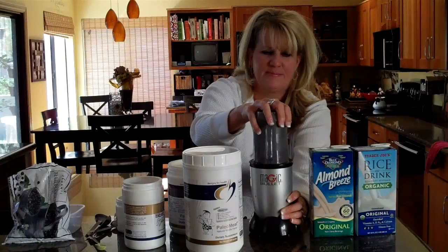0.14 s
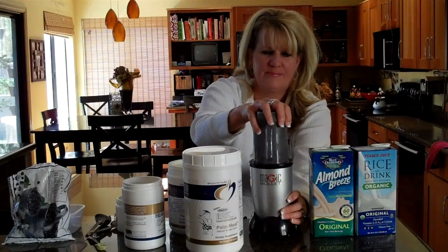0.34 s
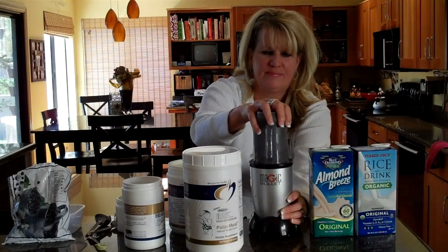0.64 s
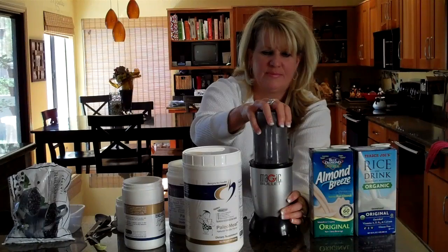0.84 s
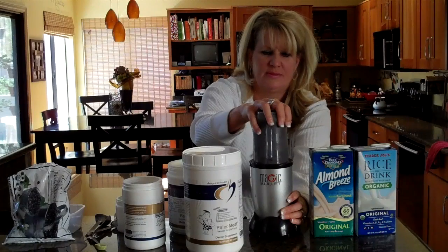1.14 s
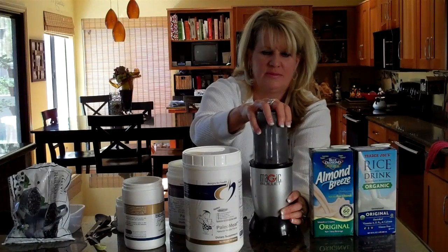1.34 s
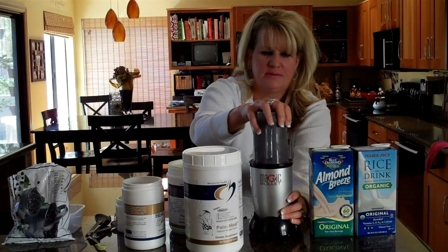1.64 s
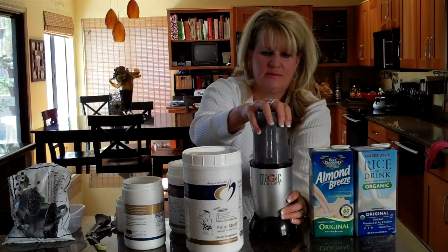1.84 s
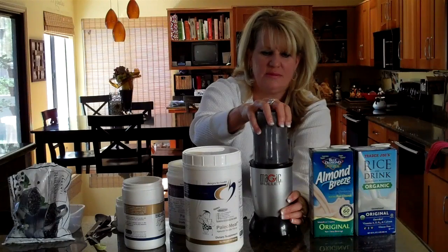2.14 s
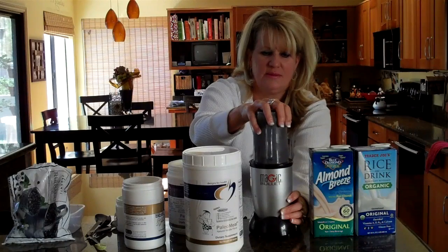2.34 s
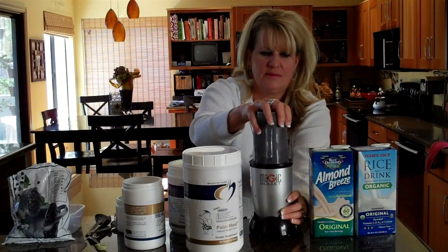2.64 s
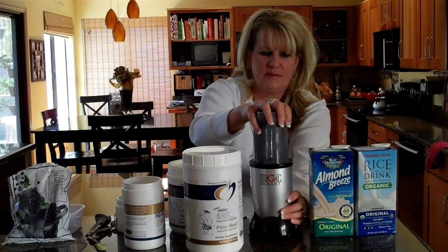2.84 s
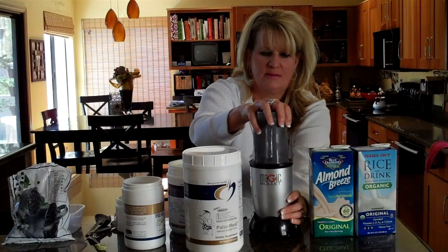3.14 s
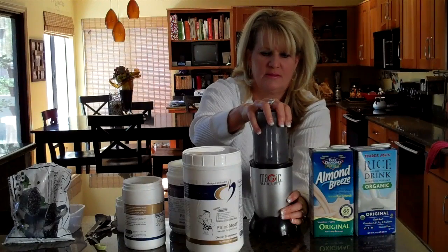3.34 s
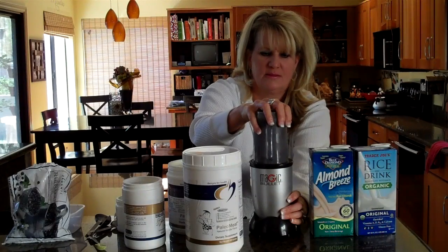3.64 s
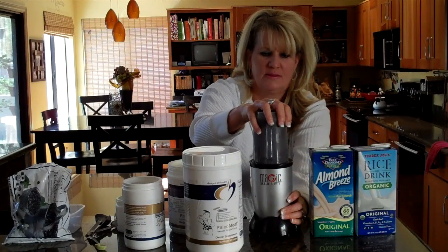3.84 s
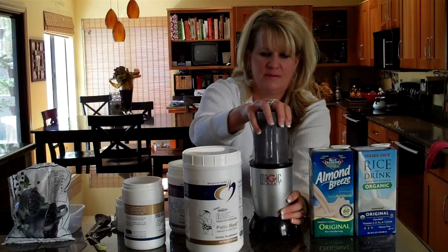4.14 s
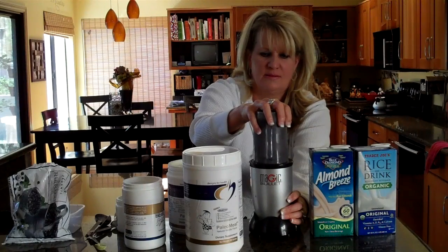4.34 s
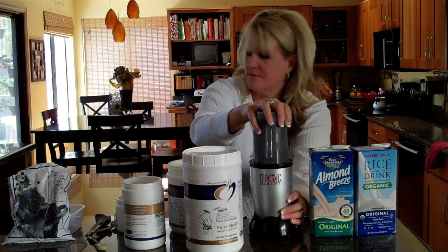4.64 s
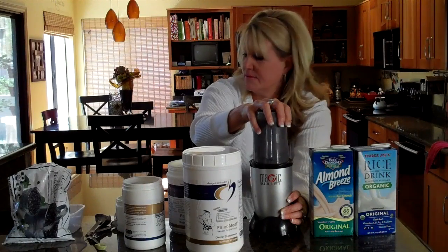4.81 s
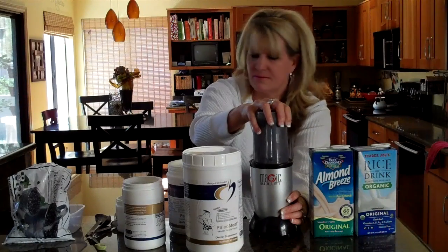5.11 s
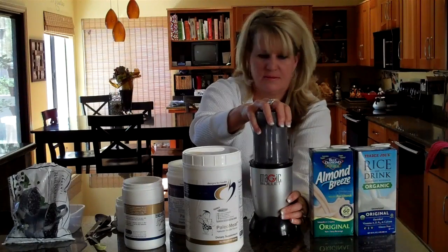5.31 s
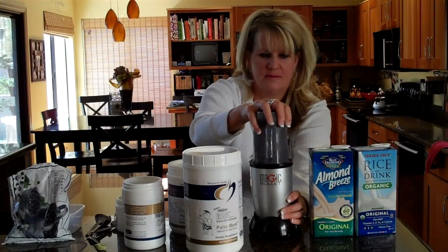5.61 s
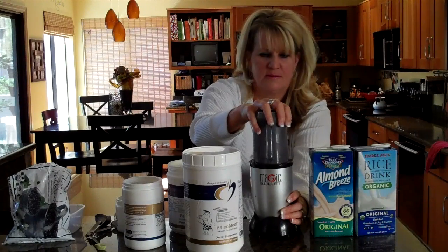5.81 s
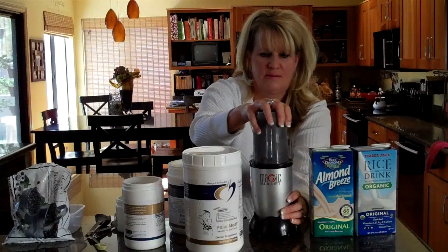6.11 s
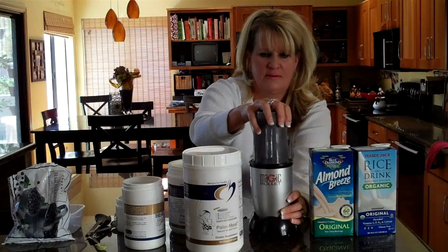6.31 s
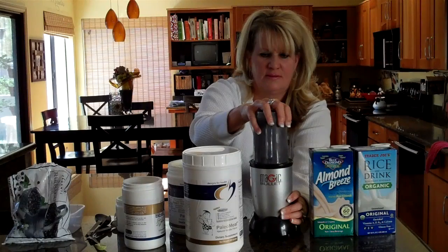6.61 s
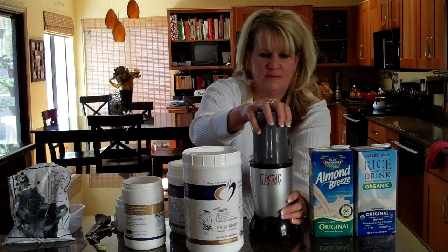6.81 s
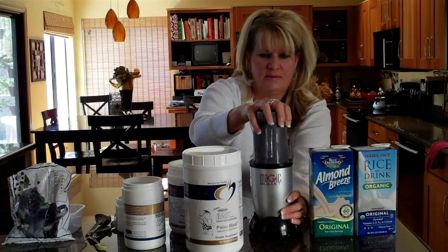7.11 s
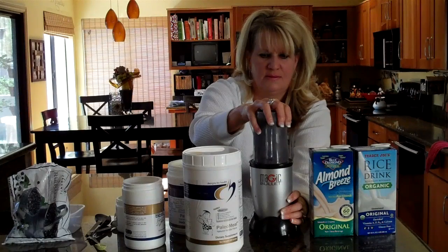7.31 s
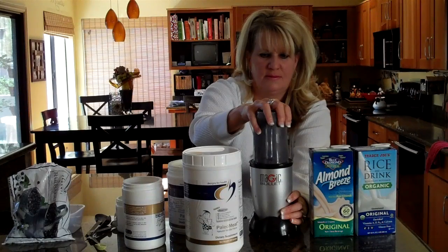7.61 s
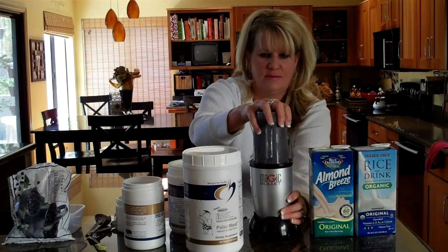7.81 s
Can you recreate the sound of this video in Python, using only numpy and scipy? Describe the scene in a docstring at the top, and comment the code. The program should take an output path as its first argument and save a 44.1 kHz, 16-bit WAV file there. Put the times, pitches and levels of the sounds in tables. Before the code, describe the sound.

A small blender runs continuously on a kitchen counter, its motor whining and wavering while ice cracks, rattles and churns inside a plastic cup.

```python
"""A small blender crushes ice on a kitchen counter, a short way from a close pair of microphones.
From the first moment the motor whines, its pitch surging and sagging along a set course, over a faint rumble.
The blade churns slush, filtered noise, and flings chips, random clicks, against the plastic cup.
Large lumps knock at set times and small ones at random: each cracks, rings the cup, thumps the base, sheds chips.
Early on there is little boom from the base; it grows as the ice breaks down. The kitchen rings a little."""
import sys
import numpy as np
from scipy import signal
from scipy.fft import rfft, irfft
from scipy.io import wavfile
from scipy.ndimage import uniform_filter1d, minimum_filter1d

SR = 44100
rng = np.random.default_rng(int(sys.argv[2]) if len(sys.argv) > 2 else 0)


def put_to_file(sound):
    """Save the sound as 16-bit audio at rate SR, in the file named by the first command-line argument."""
    columns = np.atleast_2d(sound).T  # one column per channel
    safe = np.clip(columns, -1, 1)
    whole_steps = np.round(safe * 32767)
    wavfile.write(sys.argv[1], SR, whole_steps.astype(np.int16))


N = 350991
TIME = np.arange(N) / SR  # seconds

# Resonances of the cup, raised above the colour of what strikes it.
# Each row: frequency in Hz, width in Hz, lift in dB.
CUP_RESONANCES = [(410, 55, 0.5), (903, 77, 6.5), (1069, 29, 2.5), (1826, 130, 4), (2120, 162, 10),
                  (3250, 700, 7.5), (3770, 130, 3), (6140, 820, 5.5), (7010, 260, 7.5), (9700, 570, 2.5)]


def gain_of(db):
    """Turns decibels into amplitude."""
    return 10 ** (np.asarray(db) / 20)


def evened(x):
    """Scales a sound to an rms of one."""
    return x / np.sqrt(np.mean(x ** 2) + 1e-20)


def read(points, hz):
    """Reads a table of frequency and value, interpolating over log frequency."""
    f, value = np.transpose(points)
    return np.interp(np.log(hz + 1), np.log(f + 1), value)


def curves(rows):
    """Draws each column of a time table as a curve with a value at every sample."""
    seconds, *columns = np.transpose(rows)
    return [np.interp(TIME, seconds, column) for column in columns]


def add(mix, start_s, sound):
    """Mixes a sound in from its start time, cut off at the end of the mix."""
    part = mix[max(round(start_s * SR), 0):][:len(sound)]
    part += sound[:len(part)]


def drift(rate_hz):
    """Makes a slow random wander of unit rms by low-passing noise near rate_hz."""
    hz = np.fft.rfftfreq(N, 1 / SR)
    low_pass = 1 / (1 + (hz / rate_hz) ** 4)
    return evened(irfft(rfft(rng.standard_normal(N)) * low_pass, N))


def colour(x, points, peaks=(), size=4096):
    """Applies a causal filter of unit energy: a broad colour with resonances on top."""
    hz = abs(np.fft.fftfreq(size, 1 / SR))
    resonances = sum(lift / (1 + (2 * (hz - f) / width) ** 2) for f, width, lift in peaks)
    log_gain = np.log(gain_of(read(points, hz) + resonances))
    # the Hilbert transform supplies the minimum phase
    response = np.exp(np.conj(signal.hilbert(log_gain)))
    taps = np.fft.ifft(response).real[:size // 2]
    return signal.oaconvolve(x, taps / np.linalg.norm(taps))[:N]


def equalise(x, points, share=1):
    """Applies a share of a table of dB gains without delay."""
    gain_db = share * read(points, np.fft.rfftfreq(N, 1 / SR))
    return irfft(rfft(x) * gain_of(gain_db), N)


def clicks(per_s, spread_db, cap):
    """Scatters random impacts of either sign: many small, a few large."""
    size = gain_of(spread_db * np.minimum(rng.exponential(1, N), cap))
    sign = rng.choice([-1, 1], N)
    return size * sign * (rng.random(N) < per_s / SR)


def rumble():
    """A faint steady rumble of motor and house: coloured noise."""
    # Each row: frequency in Hz, relative level in dB.
    rumble_colour = [(20, -7), (60, -4.5), (90, -14), (120, -5.5), (160, -16), (300, -24), (1000, -51)]
    return gain_of(-72) * evened(colour(rng.standard_normal(N), rumble_colour))


def motor(turns):
    """The shaft hums; armature slots and blade whine at its multiples, wavering as the load flutters."""
    # Loudness of the motor. Each row: time in seconds, whine in dB added to the order levels, shaft hum in dB.
    loudness = [(0, -17, -63), (1, -12, -69), (1.2, -13, -61), (1.95, -11, -59), (2.2, -15, -73),
                (2.65, -5, -64), (4.15, 0, -63), (4.45, -11, -75), (5.1, -11, -81), (5.75, -3, -74),
                (7.96, 0, -71)]
    # Whine of slots and blade. Each row: multiple of the shaft speed, level in dB before the whine's loudness.
    orders = [(3, -53), (6, -41), (10, -53), (12, -51), (20, -44), (40, -39), (50, -49), (60, -56),
              (70, -56)]
    whine_db, hum_db = curves(loudness)
    whine = np.zeros(N)
    for multiple, db in orders:
        waver = 1 + 0.19 * drift(22)
        phase = 2 * np.pi * multiple * turns + 0.5 * drift(24)
        whine += gain_of(db) * waver * np.sin(phase)
    # the highest line is blurred
    top = orders[-1][0]
    sizzle = gain_of(-63) * drift(92) * np.sin(2 * np.pi * top * turns)
    hum = gain_of(hum_db) * np.sin(2 * np.pi * turns)
    mains_hum = gain_of(-75) * np.sin(2 * np.pi * 120 * TIME)
    return gain_of(whine_db) * (whine + sizzle) + hum + mains_hum


def base(push):
    """The motor base booms on the counter after each push: decaying modes that take a moment to build."""
    # Modes of the base on the counter. Each row: frequency in Hz, relative level in dB, t60 in seconds.
    modes = [(357.8, -9.5, 0.28), (405.6, 4.5, 0.17), (417, -3, 0.028), (482.3, -2.5, 0.14)]
    t = np.arange(SR // 4) / SR
    ring = sum(gain_of(db - 60 * t / t60) * np.cos(2 * np.pi * hz * t) for hz, db, t60 in modes)
    build_up = 1 - np.exp(-t / .004)
    return signal.oaconvolve(push, ring * build_up)[:N]


def lumps(grind_db):
    """Lists all lumps that hit the cup: large ones as set, small at random, harder when the blade works harder."""
    # Each row: time in seconds, ring of the cup in dB, crack in dB, thump of the base in dB.
    large = [(0.0117, -9, -30, -37), (0.022, -17, -24, -36), (0.164, -11, -26.5, -46),
             (0.2677, -11.5, -30, -50), (0.3, -3, -27, -31), (0.446, -12.5, -35, -50),
             (0.4847, -22, -24.5, -36), (0.625, -10.5, -30, -34.5), (0.6635, -9, -34, -41),
             (0.7016, -13, -30.5, -42), (0.7727, -29, -28, -46), (0.7928, -25, -29, -34.5),
             (0.9233, -12, -31.5, -50), (1.0111, -10.5, -27.5, -43), (1.0355, -11, -26, -38),
             (1.0805, -18, -25, -45), (1.0976, -19, -24, -37), (1.1175, -5, -21.5, -37),
             (1.2075, -19, -28, -45), (1.2336, -12, -24.5, -41), (1.411, -12, -27.5, -55),
             (1.495, -18, -29, -38), (1.736, -5.5, -24, -47), (1.7749, -3, -18, -53),
             (1.8696, -2, -19.5, -27.5), (1.8782, -1, -18, -38), (2.0416, -8, -25.5, -26.5),
             (2.0527, -9, -33, -31.5), (2.2295, -15, -31, -52), (2.37, -14, -30, -56),
             (2.575, -11, -26, -33.5), (2.599, -8, -28, -43), (2.707, -4, -25, -53), (2.7125, -5, -24, -41),
             (2.7374, -18, -17.5, -30), (2.8567, -19, -26, -40), (2.9988, -15, -24.5, -52),
             (3.0722, -9.5, -26, -53), (3.1004, -12, -25.5, -41), (3.1872, -4, -24, -33.5),
             (3.2256, -13.5, -23.5, -47), (3.3513, -12, -24, -36.5), (3.4946, -4, -25, -35),
             (3.6356, -13, -24, -43), (3.6725, -9, -34, -36), (3.7875, -9.5, -34, -43),
             (3.8619, -22, -18.5, -34), (4.1689, -7, -21.5, -35), (4.1841, -23, -22, -34),
             (4.3203, 0, -16, -43), (4.5828, -7.5, -24.5, -41), (4.6294, -6.5, -21, -34),
             (4.6736, -6.5, -27.5, -40), (4.7619, -7, -26, -38.5), (4.8314, -27, -29.5, -38),
             (4.9343, -18, -29, -42), (5.0175, -19, -28, -46), (5.0604, -19, -29.5, -50),
             (5.2231, -17, -32, -39), (5.248, -27, -23, -40), (5.2789, -11, -28, -52),
             (5.3483, -13, -24, -44), (5.4248, -12, -23.5, -58), (5.5527, -14, -25, -33),
             (5.6361, -20, -23, -39), (5.8306, -2.5, -19, -43), (5.9928, -18, -25, -45),
             (6.2921, -20, -29, -43), (6.3159, -10, -29.5, -47), (6.3777, -10, -26.5, -38),
             (6.4255, -21, -24, -37), (6.5224, -13, -27, -33.5), (6.6773, -26, -24.5, -32.5),
             (6.7989, -13, -23, -43), (6.9476, -16, -26.5, -34), (7.0658, -13, -32, -35),
             (7.127, -13, -24, -42), (7.2472, -17, -22.5, -34), (7.2664, -9, -30, -35),
             (7.3995, -13, -25.5, -42), (7.728, -9, -31, -46)]
    per_s, spread_db = 11, 2.5  # how often small lumps strike, how unevenly (either way)
    small_db = np.array([10, -3.5, -18.5])  # their ring, crack and thump against the grinding level
    chance = rng.random((140, 4))
    times = np.cumsum(-np.log(1 - chance[:, 0])) / per_s
    levels = small_db + spread_db * (2 * chance[:, 1:] - 1)
    levels = levels + np.interp(times, TIME, grind_db)[:, None]
    small = np.column_stack([times, levels])
    return np.vstack([large, small])


def showers(hits):
    """Each lump that breaks throws a brief shower of chips, which sets their level here."""
    shower_db, settle_s = -8, 0.036  # level against the lump's crack, time constant
    t = np.arange(SR // 4) / SR
    level = np.zeros(N)
    for start_s, _, crack_db, _ in hits:
        add(level, start_s, gain_of(crack_db + shower_db) * np.exp(-t / settle_s))
    return level


def churn(turns, grind_db, lumpy, hits):
    """Slush rushes round the cup; chips strike its wall in time with the blade and boom the base."""
    # Colours of slush and of chips. Each row: frequency in Hz, relative level in dB per Hz.
    slush_colour = [(30, -29), (100, -26.5), (150, -23), (220, -9.5), (300, -8.5), (380, 4), (520, -1),
                    (680, 0), (900, 0.5), (1300, 1.5), (2000, -1), (3500, -18.5), (8000, -12.5),
                    (12500, -32.5)]
    chip_colour = [(300, -54.5), (1000, -23.5), (1400, -12.5), (1750, -7), (2650, -10), (3250, -4.5),
                   (4100, -4), (4800, -11), (5500, -11), (6100, -12.5), (6650, -15), (7100, -13),
                   (7900, -20), (9700, -22.5), (12000, -45)]
    # levels in dB against the grinding; slush and boom shift with the share of ice still in lumps
    fine_db, coarse_db = -2, -9
    slush_db = -9.5 + 0.5 * lumpy
    boom_db = -13.5 - 20 * lumpy
    blade = 1 + 0.16 * np.cos(2 * np.pi * turns) + 0.16 * np.cos(4 * np.pi * turns)

    rush = evened(colour(rng.standard_normal(N), slush_colour, CUP_RESONANCES))
    slush = rush * gain_of(grind_db + slush_db + 0.14 * drift(41))

    patter = evened(colour(clicks(7000, 1.74, 1.63) * blade, chip_colour, CUP_RESONANCES))
    steady_level = gain_of(grind_db + fine_db + 1.93 * drift(30))
    fine = patter * np.hypot(steady_level, showers(hits))

    strikes = clicks(330, 8.2, 2.6) * blade
    coarse = evened(colour(strikes, chip_colour, CUP_RESONANCES)) * gain_of(grind_db + coarse_db)
    boom = evened(base(strikes)) * gain_of(grind_db + boom_db)
    return slush + fine + coarse + boom


def knocks(hits):
    """A lump shatters for a few ms, rings the stiff cup wall and pushes the base."""
    # Colour of the crack. Each row: frequency in Hz, relative level in dB per Hz.
    crack_colour = [(80, -37), (250, -16), (800, -10.5), (1800, -1), (3000, 1), (4000, 8), (5000, 0),
                    (6100, 5), (6650, -2.5), (7200, -2), (8000, -7.5), (9700, -14), (13000, -41.5)]
    ring_hz, ring_spread_hz = 3313, 126  # the wall rings a little differently wherever it is struck
    t = np.arange(SR // 40) / SR
    rings, cracks, pushes = np.zeros((3, N))
    swell = (1 - np.exp(-t / .0006)) * np.exp(-t / .0012)
    swell = swell / swell.max()
    shatter = (1 - np.exp(-t / .0005)) * (np.exp(-t / .0014) + .04 * np.exp(-t / .008))
    for start_s, ring_db, crack_db, thump_db in hits:
        splinters, rattle = rng.standard_normal((2, len(t)))
        hz = ring_hz + ring_spread_hz * rng.standard_normal()
        # the lump still presses on the wall and unsettles its ring
        wobble = 0.031 * np.cumsum(uniform_filter1d(rattle, size=30))
        add(rings, start_s, gain_of(ring_db) * swell * np.sin(2 * np.pi * hz * t + wobble))
        add(cracks, start_s, gain_of(crack_db) * evened(splinters * shatter))
        add(pushes, start_s, gain_of([thump_db]))
    # the cup's rings and cracks carry little below about 300 Hz
    low_cut = signal.butter(2, 300, "high", fs=SR, output="sos")
    cup = signal.sosfilt(low_cut, rings + colour(cracks, crack_colour, CUP_RESONANCES))
    return cup + base(pushes)


def kitchen(x, wet_db):
    """The room adds a few early echoes and a short diffuse tail, different at each microphone."""
    # Decay of the room. Each row: frequency in Hz, t60 in seconds.
    decay = [(150, 1), (1000, 0.28), (4000, 0.42), (12000, 0.31)]
    # Echoes off nearby tubs, cartons and the counter, against the direct sound before the stereo is widened.
    # Each row: delay in seconds, left level in dB, right level in dB.
    echoes = [(.0012, -12.5, -26), (.0029, -37, -49), (.0113, -18.5, -13), (0.0164, -28, -15),
              (.0212, -52, -29)]
    noise = rng.standard_normal((2, SR // 2))
    hz, t, spectrum = signal.stft(noise, SR, nperseg=256)
    # so close to the blender, the bass below about 700 Hz arrives mostly direct
    bass_cut = (hz / np.hypot(hz, 700))[:, None]
    fade = gain_of(-60 * t / read(decay, hz)[:, None])
    build_up = 1 - np.exp(-t / 0.0038)
    tail = signal.istft(spectrum * bass_cut * fade * build_up, SR, nperseg=256)[1]
    response = gain_of(wet_db) * tail / np.linalg.norm(tail[0])
    response[:, 0] += 1  # direct sound
    for delay_s, left_db, right_db in echoes:
        response[:, round(delay_s * SR)] += gain_of([left_db, right_db])
    return signal.fftconvolve(x[None], response, axes=1)[:, :N]


def scatter(x, size=160):
    """Clutter on the counter smears the sound from the sides: a random ripple over frequency."""
    noise = np.pad(rng.standard_normal(size), (0, N - size))
    ripple = evened(rfft(np.roll(noise, -size // 2)).imag)
    return irfft(rfft(x) * 1j * ripple, N)


def scene():
    """Sets the blender in its kitchen, before a close pair of microphones."""
    # Shaft speed. Each row: time in seconds, turns per second (a slight drift comes on top).
    shaft_speed = [(0, 166), (.8, 166.5), (1.02, 178), (1.25, 164.5), (2.15, 164), (2.5, 185), (2.72, 168),
                   (3.05, 171.5), (3.35, 169.5), (4.15, 170.5), (4.32, 177), (4.55, 179.5), (4.75, 172),
                   (5.35, 175), (5.65, 172.5), (6.65, 173), (7.2, 170), (7.96, 170.7)]
    # How hard the blade works: it surges when a mass of ice falls in, and eases when it spins free.
    # Each row: time in seconds, reference level of the grinding in dB.
    load = [(0, -30.5), (.8, -32), (1.09, -25.5), (1.35, -28.5), (1.62, -30), (1.75, -22), (1.95, -30),
            (2.3, -32), (2.6, -23.5), (2.85, -28), (3.3, -29), (3.5, -26.5), (4, -26.5), (4.18, -23),
            (4.55, -27), (4.8, -31), (5.17, -32.5), (5.55, -27.5), (5.82, -25.5), (6.1, -26.5), (6.65, -26),
            (7.96, -24.5)]
    # Stereo width. Each row: frequency in Hz, gain in dB on the side signal.
    width = [(30, -3), (120, -3), (350, -27.5), (900, -14.5), (2500, -12.5), (5000, -11), (8000, -7.5),
             (12000, -6.5)]
    # Stereo balance. Each row: frequency in Hz, gain in dB on the left (a small opposite share on the right).
    balance = [(60, -2), (300, -1.5), (900, -2), (2200, -0.5), (3300, -0.8), (6000, -1.5), (9000, -3.5),
               (12000, 2.5)]
    (speed,) = curves(shaft_speed)
    (grind_db,) = curves(load)
    turns = np.cumsum(speed * (1 + .002 * drift(10))) / SR
    lumpy = np.exp(-TIME / 2.88)  # share of the ice still in lumps
    hits = lumps(grind_db)
    blender = motor(turns) + churn(turns, grind_db, lumpy, hits) + knocks(hits)
    left, right = kitchen(blender + rumble(), wet_db=-6.5)
    mid = (left + right) / 2
    room_side = (left - right) / 2
    side = equalise(gain_of(-2.5) * scatter(mid) + gain_of(10.5) * room_side, width)
    return np.array([equalise(mid + side, balance, share=1.0),
                     equalise(mid - side, balance, share=-0.13)])


def record(dry):
    """A quick limiter holds peaks at full scale; then a low-pass sets the band limit."""
    allowed = 1 / np.maximum(abs(dry).max(0), 1)
    limited = dry * uniform_filter1d(minimum_filter1d(allowed, size=31), size=31)
    low_pass = signal.firwin(255, 12700, window=("kaiser", 8), fs=SR)
    return signal.oaconvolve(limited, low_pass[None], "same")


dry = scene()
out = record(dry)
put_to_file(out)
```